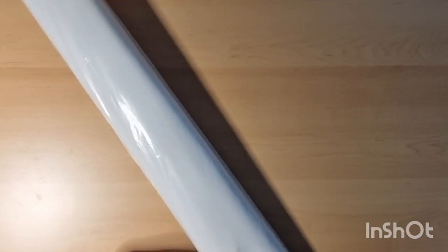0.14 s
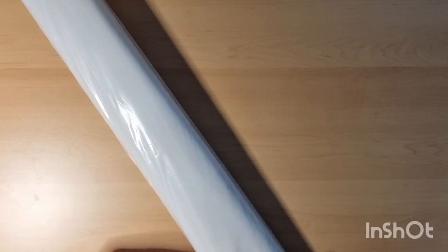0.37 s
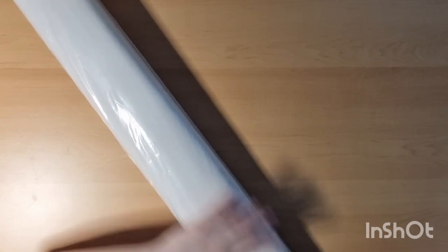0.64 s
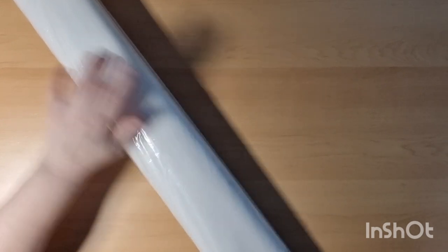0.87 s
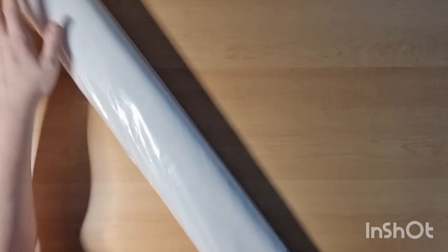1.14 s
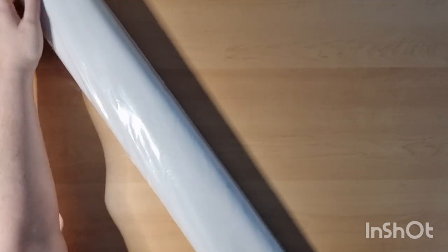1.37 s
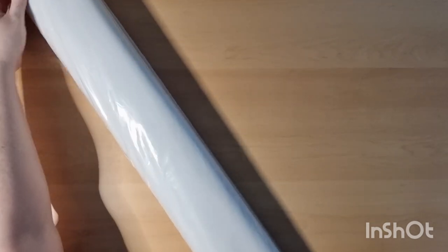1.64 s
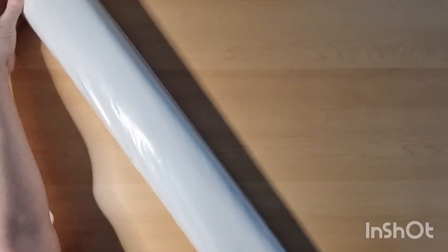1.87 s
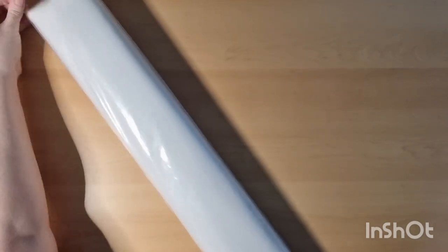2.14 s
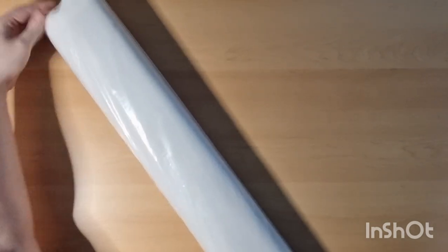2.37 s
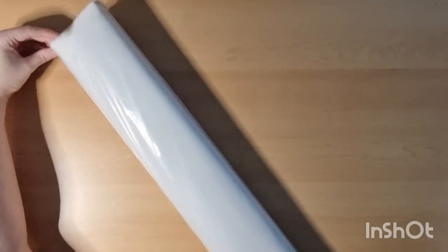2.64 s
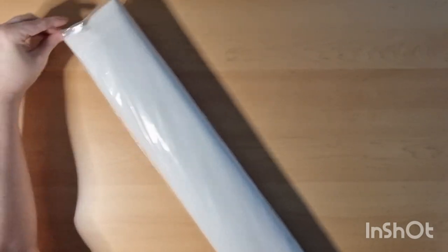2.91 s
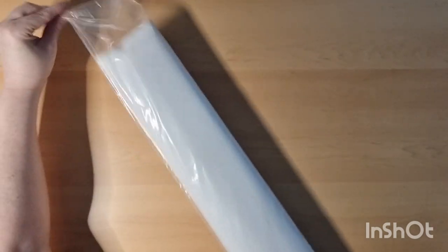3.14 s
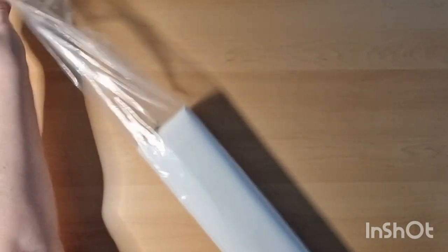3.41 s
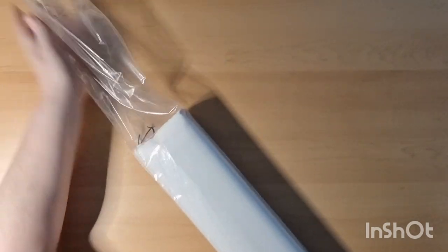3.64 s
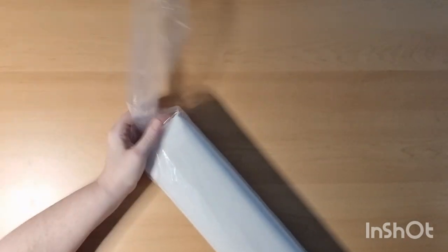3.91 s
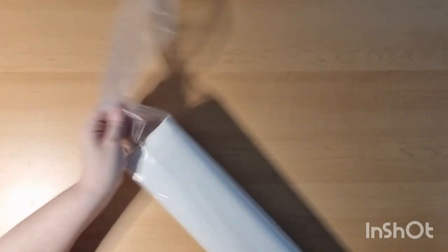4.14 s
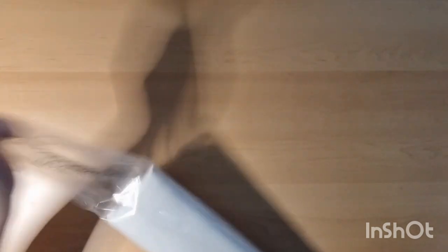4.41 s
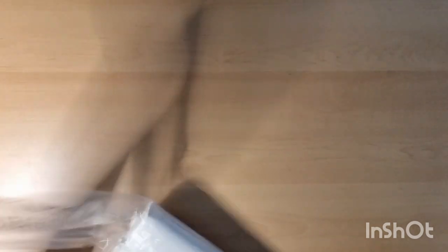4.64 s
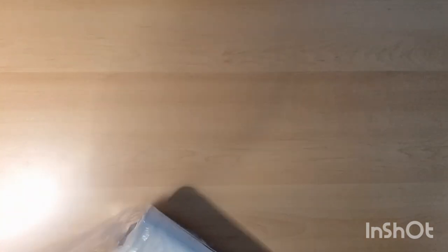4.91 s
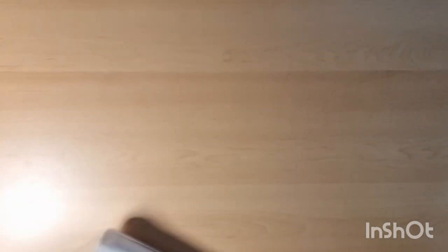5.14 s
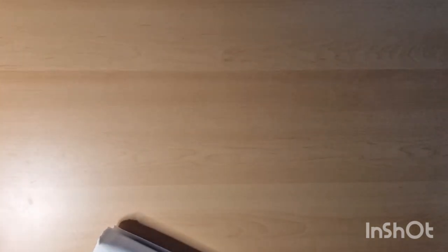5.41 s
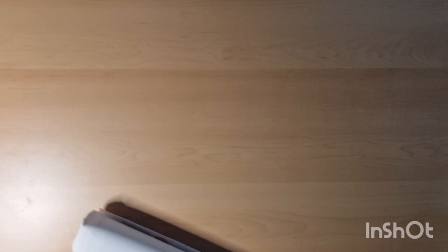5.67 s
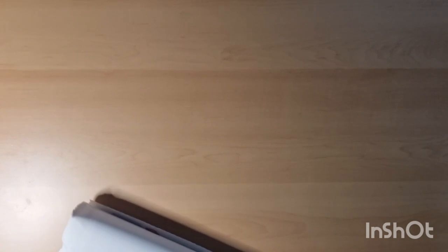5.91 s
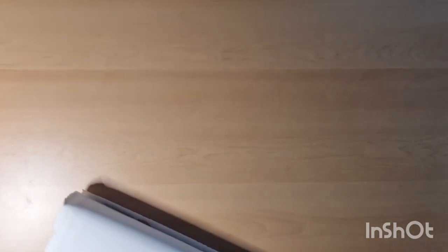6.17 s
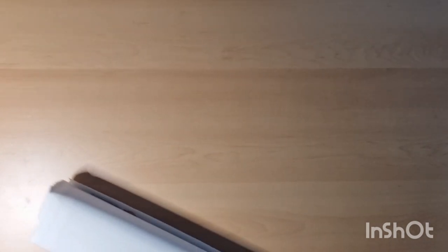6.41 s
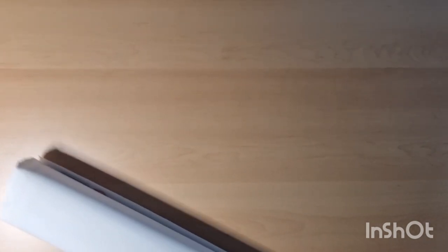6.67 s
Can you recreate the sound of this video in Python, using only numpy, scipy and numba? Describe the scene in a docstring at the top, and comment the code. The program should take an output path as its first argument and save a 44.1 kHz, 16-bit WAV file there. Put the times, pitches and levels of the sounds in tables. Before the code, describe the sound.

Plastic sleeve on a rolled canvas crinkles in short quiet bursts, then is pulled off with loud dense crackling, sharp snaps and soft table knocks.

```python
"""Film crackles in short bursts, with single snaps and soft knocks, over a low rumble:
hands pick at the plastic sleeve of a rolled canvas on a wooden table, then pull it off.
Buckling creases flick patches of film, each a damped sine; the roll rings with them and groans faintly.
The table top mirrors the crackle and knocks; a small room adds a short noise tail and filtered-noise rumble."""
import sys
import numpy as np
from scipy import signal
from scipy.fft import rfft, irfft, next_fast_len
from scipy.io import wavfile
from scipy.ndimage import uniform_filter1d
from numba import njit

SR = 44100
rng = np.random.default_rng(int(sys.argv[2]) if len(sys.argv) > 2 else 0)


def field_ratio(decibels):
    """Amplitude ratio for a level in dB (20 dB per decade); scalars and array-likes work."""
    return 10 ** (np.asarray(decibels, dtype=float) / 20)


def digitize_waveform(pressure):
    """Quantize a signal to 16-bit integers and store it at the path in sys.argv[1].

    Rows of a 2-D input are taken as channels; values are limited to [-1, 1].
    """
    field = np.atleast_2d(pressure).T
    bounded = np.clip(field, -1, 1)
    quanta = np.round(bounded * 32767).astype(np.int16)
    wavfile.write(sys.argv[1], SR, quanta)


N = 299434
T = np.arange(N) / SR

# where the hands work: start_s, left_lag_ms (left later than right), table_echo_ms, roll_ring_db
PLACE = [(0, -0.092, 1.13, -5), (1.2, -0.14, 1.19, -4.5), (2, 0.043, 1.22, -0.5), (3.2, 0.023, 1.14, -12),
         (3.6, 0.028, 0.63, -29), (4.2, 0.016, 0.99, -14.5), (4.8, 0.03, 0.976, -37),
         (5.6, 0.32, 0.98, -28), (6.79, 0.29, 0.96, -18)]


def curve(table, t=T):
    """Columns of a table, interpolated at times t."""
    s, *columns = np.transpose(table)
    return [np.interp(t, s, column) for column in columns]


def walk(rate_hz):
    """Random levels held 1 / rate_hz and slewed; spread near 1."""
    hold = int(SR / rate_hz)
    levels = np.repeat(rng.standard_normal(N // hold + 1), hold)
    return np.sqrt(1.5) * uniform_filter1d(levels, hold)[:N]


def shape(x, gain):
    """Filter by a gain given as a function of frequency."""
    n = next_fast_len(N)
    f = np.arange(n // 2 + 1) * SR / n + 1e-3
    return irfft(rfft(x, n) * gain(f), n)[..., :N]


def colour(points):
    """Gain through (Hz, dB) points, straight in log frequency."""
    hz, db = np.transpose(points)
    return lambda f: field_ratio(np.interp(np.log(f), np.log(hz), db))


def resonance(f, hz, width_hz):
    """Band-pass response of one mode, gain 1 at its centre."""
    return 1 / (1 + 1j * (f / hz - hz / f) * hz / width_hz)


def crackle():
    """Dense showers of small creases, some bigger than most, coming in flurries as the film is gripped."""
    # shape of the sleeve: start_s, fine_wrinkles_db (re crackle), folds_hz, hollow_under_film_hz
    sleeve = [(0, -10, 1820, 2350), (.95, -8, 1680, 2440), (1.1, -13.5, 1110, 2100),
              (1.5, -11.5, 1700, 2940), (1.95, -8, 1210, 2720), (2.93, -6, 1740, 3280),
              (2.97, -5, 2450, 5050), (3.09, -14, 2600, 4970), (3.125, -11.5, 1970, 3200),
              (3.3, -3.5, 1750, 2880), (3.7, -11.5, 4230, 3260), (3.83, -10.5, 1850, 3430),
              (4.0, -10.5, 1620, 3180), (4.4, -2.5, 1110, 3380), (4.56, -3.5, 2030, 3250),
              (4.61, -7, 865, 3300), (4.66, -4, 1510, 3350), (4.72, -8.5, 1110, 3370),
              (4.95, -7, 1450, 3150), (5.04, -10, 1000, 3360), (5.17, -7.5, 1600, 2420),
              (6.79, -6.5, 950, 4270)]
    creases_per_s = 1700
    chance = rng.random((int(creases_per_s * N / SR), 2))
    s = chance[:, 0] * N / SR
    at = (s * SR).astype(int)
    db, low_db = effort(s)
    brightness = rng.standard_normal(len(s))
    high_db, folds_hz, hollow_hz = curve(sleeve, s)
    high_db = high_db + 1.0 * brightness
    # the folds keep shifting, so their pitches wander
    folds_hz = folds_hz * np.exp(.08 * walk(30)[at])
    hollow_hz = hollow_hz * np.exp(.035 * walk(20)[at])
    # now hollow, now papery
    stands_db = np.maximum(7 + 1.5 * walk(25)[at], 0)
    flurry_db = (1.68 * walk(70) + 1.19 * walk(28))[at]
    # exponential excess, levelling off at 9 dB
    big_db = 9 * np.tanh(-3.2 * np.log(chance[:, 1]) / 9)
    return creases(s, db + flurry_db + big_db, low_db, high_db, [folds_hz, hollow_hz], count=9,
                   spread_s=.0011, scatter_db=4, cycles=2.0, roam_ms=0.076, peak_db=stands_db, width=.12)


def effort(s):
    """Crackle level and share of large folds at times s: grips bite, swell or sink, and die away when let go."""
    # grips and pulls: start_s, length_s, end_level_db, swell_db (up to the end), large_folds_db (re crackle)
    grips = [(0, 0.066, -59, -7.5, -11), (0.129, 0.06, -53.5, 19, -7.5), (0.268, 0.17, -51, 21.5, -7),
             (0.462, 0.19, -59, -6.5, -3.5), (0.678, 0.26, -56, -3.5, -8), (1.054, 0.067, -46.5, 21, -7.5),
             (1.201, 0.057, -53, -0.5, -7), (1.34, 0.12, -59, 2, -6.5), (1.463, 0.15, -53, 3.5, -6.5),
             (1.746, 0.16, -64.5, -6, -10), (1.951, 0.021, -54, 0.5, -10.5),
             (2.072, 0.081, -53.5, 19, -8.5), (2.406, 0.016, -54.5, 8, -12.5), (2.493, 0.045, -57.5, 6, -7),
             (2.605, 0.12, -59.5, -5, -7.5), (2.785, 0.4, -55.5, 2, -3), (2.972, 0.056, -52, 0, -4.5),
             (3.061, 0.15, -47.5, -3, -6), (3.232, 0.066, -45, 11.5, -9), (3.359, 0.085, -60, -8, -12),
             (3.463, .11, -52.5, 13.5, -1.5), (3.639, 0.15, -44, 8.5, -10.5), (3.79, 0.06, -41.5, 15, -7.5),
             (3.939, 0.035, -44, -1, -4.5), (4.027, 0.03, -48.5, 10, -4.5), (4.122, 0.11, -42, 13, -0.5),
             (4.256, 0.045, -50, -2, -2.5), (4.347, 0.011, -50, -7.5, -0.5), (4.393, 0.11, -44.5, -1, 1),
             (4.52, 0.15, -37.5, 10.5, -4), (4.72, 0.015, -41, -6.5, -7.5), (4.756, 0.031, -56, 1, 7.5),
             (4.932, 0.09, -45.5, 7.5, -4.5), (5.069, 0.017, -45.5, 6, -5), (5.142, 0.031, -44.5, 2, -5),
             (5.6, 0.15, -62, 4.5, -9.5), (5.906, 0.07, -57, -2.5, -3), (5.97, 0.047, -53, 6, -11.5)]
    attack_db_per_s, release_db_per_s = 900, 245
    settling_db, settling_folds_db = -71, -5  # the film creeps back on its own between grips
    start, length, end_db, swell_db, folds_db = np.transpose(grips)[..., None]
    since = s - start
    db = end_db - swell_db * (1 - np.clip(since / length, 0, 1))
    db = db + attack_db_per_s * np.minimum(since, 0)
    db = db - release_db_per_s * np.maximum(since - length, 0)
    power = field_ratio(np.maximum(db, -150)) ** 2
    rest = field_ratio(settling_db) ** 2
    total = power.sum(0) + rest
    share_db = ((power * folds_db).sum(0) + rest * settling_folds_db) / total
    return 10 * np.log10(total), share_db


def creases(s, db, low_db, high_db, peaks_hz, count, spread_s, scatter_db, cycles, roam_ms, peak_db,
            width=0.13):
    """Each buckling crease flicks patches of film of every size; big patches ring low, some sizes stand out."""
    film_low, film_high = np.log([210, 16500])  # log Hz
    low_zone, mid_zone, high_zone = np.log([850, 3700, 10600])  # log Hz
    chance = rng.random((len(s), count, 4))
    odd = rng.standard_normal((len(s), count, 3))

    place_in_band = (np.arange(count) + chance[..., 0]) / count
    hz = np.exp(film_low + place_in_band * (film_high - film_low))
    low = np.clip((np.log(hz) - mid_zone) / (low_zone - mid_zone), 0, 1)
    high = np.clip((np.log(hz) - mid_zone) / (high_zone - mid_zone), 0, 1)
    favoured = sum(np.exp(-(np.log(hz / p[:, None]) / width) ** 2) for p in peaks_hz)

    tone_db = db[:, None] + low * low_db[:, None] + high * high_db[:, None]
    tone_db = tone_db + np.reshape(peak_db, (-1, 1)) * favoured + scatter_db * odd[..., 0]
    # thin film radiates poorly from its largest patches
    tone_db = tone_db - 20 * np.log10(1 + (330 / hz) ** 2)
    turns = cycles * (.5 + 3 * chance[..., 1] ** 3) * (1 + .2 / width * favoured)
    size = field_ratio(tone_db) * np.sqrt(hz / np.exp(mid_zone) / turns) * np.sign(chance[..., 2] - .5)

    start = s[:, None] - spread_s * np.log(chance[..., 3])
    lag_ms = curve(PLACE, s)[0][:, None] + roam_ms * odd[..., 1]
    # large patches reach both ports alike, small ones beam unevenly
    side_db = 0.39 + 2.4 * (1 - low) * odd[..., 2]
    channels = []
    for ear in (1, -1):  # left, right
        ear_start = (start + ear * lag_ms / 2000) * SR
        ear_size = size * field_ratio(ear * side_db)
        channels.append(rings(ear_start.ravel(), hz.ravel(), turns.ravel(), ear_size.ravel(), N))
    return np.array(channels)


@njit
def rings(start, hz, cycles, size, length, rise=.3):
    """Damped sines that start between samples, swell in rise cycles and fade by 1/e every given cycles."""
    out = np.zeros(length)
    for k in range(len(start)):
        first = int(start[k]) + 1
        late = first - start[k]
        pole = (2j * np.pi - 1 / cycles[k]) * hz[k] / SR
        z, turn = size[k] * np.exp(pole * late), np.exp(pole)
        held, ease = np.exp(-hz[k] / SR / rise * late), np.exp(-hz[k] / SR / rise)
        last = min(first + int(6 * cycles[k] * SR / hz[k]), length)
        for j in range(max(first, 0), last):
            out[j] += z.imag * (1 - held)
            z, held = z * turn, held * ease
    return out


def snaps():
    """A long crease gives way within a millisecond or two; its neighbours follow in a fading shower."""
    # single snapping creases: start_s, level_db, pitch_hz, high_part_db
    snap_list = [(0.1353, -44, 4110, -15), (0.1814, -43, 2430, -6), (0.291, -42.5, 1510, -29),
                 (1.154, -42, 5000, -20), (1.2433, -38, 5700, -8.5), (1.4695, -38, 1680, -16),
                 (1.7223, -39.5, 1080, -22), (1.8615, -36.5, 1760, -41), (1.952, -35.5, 1160, -54),
                 (2.144, -42, 1600, -18), (2.325, -42.5, 1530, -9), (2.416, -42, 3100, -6),
                 (2.785, -38, 2880, -5), (2.925, -39, 1820, -8), (2.9762, -43.5, 2460, 8.5),
                 (2.994, -29, 5270, -6), (3.058, -39, 5030, -13), (3.3037, -18.5, 2900, -30),
                 (3.315, -43, 2900, 2), (3.333, -38, 3100, -20), (3.3904, -29, 3180, -5),
                 (3.468, -42, 3600, 3), (3.517, -38.5, 3100, -12), (3.569, -43.5, 3170, 0),
                 (3.713, -37, 3350, -1.5), (3.772, -30, 3480, -31), (3.828, -32.5, 3220, -9),
                 (3.8475, -27.5, 1770, -18), (3.896, -28, 900, -39), (3.92, -47, 1580, -33),
                 (4.0269, -35.5, 3200, -7), (4.0548, -32.5, 4660, 2), (4.137, -38, 3600, -7),
                 (4.22, -32.5, 3200, 0), (4.2599, -25.5, 3220, -6), (4.3034, -29.5, 1220, -8),
                 (4.342, -34.5, 1180, 8.5), (4.4017, -24, 1500, -12), (4.4338, -23, 6000, -4.5),
                 (4.472, -28, 1120, -12), (4.501, -34, 5800, -8), (4.515, -30, 5600, -8),
                 (4.673, -33, 5400, -3), (4.7195, -26.5, 3500, -12), (4.7282, -34, 5050, -1),
                 (4.813, -42.5, 1360, 0.5), (4.901, -37, 6400, -10), (4.931, -30.5, 1310, -38.5),
                 (4.9457, -38, 3070, -2), (4.982, -25.5, 1410, -33), (4.986, -38, 5270, -1),
                 (5.1468, -28.5, 2270, -25), (5.338, -45, 3700, -36.5), (5.402, -43, 3630, -11),
                 (5.7252, -40.5, 3240, -7), (5.9585, -42, 3530, -8), (6.015, -38, 2860, -16),
                 (6.37, -54, 3100, -17), (6.483, -45, 4460, -27), (6.6314, -46.5, 4500, -14)]
    s, db, hz, high_db = np.transpose(snap_list)
    low_db = effort(s)[1] - 6
    crack = creases(s, db, low_db, high_db, [hz], count=28, spread_s=0.0007,
                    scatter_db=1.0, cycles=0.94, roam_ms=0.056, peak_db=9, width=0.25)
    shower = creases(s, db - 10.5, low_db, high_db, [hz], count=60, spread_s=0.0045,
                     scatter_db=2.5, cycles=1.7, roam_ms=.04, peak_db=5, width=.18)
    return crack + shower


def ticks():
    """A tiny wrinkle pops all at once, thin and bright: no pitch, little bass."""
    # ticking fine wrinkles: start_s, level_db
    tick_list = [(0.227, -47), (0.425, -47.5), (0.438, -56), (1.5688, -43.5), (1.5903, -45), (1.7594, -56),
                 (1.8062, -44.5), (1.829, -55), (1.936, -51), (1.9946, -49), (2.302, -47.5),
                 (2.5025, -41.5), (2.951, -44), (3.283, -49), (3.293, -48), (3.372, -41), (3.5418, -41),
                 (3.9439, -49), (4.001, -48), (4.1874, -41), (4.233, -42), (4.665, -38), (4.8713, -44.5),
                 (5.226, -53), (5.3862, -63), (5.69, -56), (6.1014, -50.5)]
    s, db = np.transpose(tick_list)
    return creases(s, db, 0 * s - 18, 0 * s + 1.5, [], count=24, spread_s=.0008,
                   scatter_db=3.5, cycles=1.4, roam_ms=.04, peak_db=0)


def knocks():
    """The roll bumps the table: a few cycles of roll and table top."""
    # bumps: start_s, level_db, pitch_hz
    knock_list = [(0.549, -48, 326), (0.804, -41, 317), (0.822, -42, 324), (1.133, -37, 1110),
                  (1.591, -38, 490), (1.615, -38, 404), (2.311, -45.5, 520), (2.431, -40, 422),
                  (4.256, -30, 705), (4.4037, -27, 910)]
    s, db, hz = np.transpose(knock_list)
    return rings(s * SR, hz, 0 * s + 2.4, field_ratio(db), N)


def groan():
    """The dragged roll groans faintly: a weak falling sine under a rounded envelope."""
    # one groan: start_s, length_s, first_hz, last_hz, level_db
    drag = (4.5, 0.43, 310.5, 204.5, -61)
    start, length, first_hz, last_hz, db = drag
    part = np.clip((T - start) / length, 0, 1)
    phase = 2 * np.pi * np.cumsum(first_hz + part * (last_hz - first_hz)) / SR
    return field_ratio(db) * 2 * np.sqrt(part * (1 - part)) * np.sin(phase)


def roll_ring(film):
    """Film excites the damped modes of the roll."""
    # modes of the roll: centre_hz, width_hz, relative_db
    roll_modes = [(313, 21, 17), (665, 78, 1), (1144, 39, 8), (1680, 24, 0)]
    return shape(film, lambda f: sum(field_ratio(db) * resonance(f, hz, w) for hz, w, db in roll_modes))


def table_mirror(near, echo_ms):
    """The table top reflects the sound, delayed slightly differently at the two ports."""
    left, right = near
    late_left = np.interp(T - (echo_ms + .03) / 1000, T, left)
    late_right = np.interp(T - (echo_ms - .03) / 1000, T, right)
    return field_ratio(-10) * np.array([late_left, late_right])


def ports(noise, alike_hz):
    """Two microphone ports in a diffuse field: bass mostly alike, treble unrelated from alike_hz up."""
    side = lambda f: np.clip(.2 + .8 * f / alike_hz, 0, 1)
    mid = lambda f: np.sqrt(2 - side(f) ** 2)
    return shape(noise[0], mid) + shape(noise[1], side) * np.array([[1], [-1]])


def room(x, t60_s, db, first_s):
    """Diffuse tail that starts after the nearest wall, duller than the source."""
    fade = np.exp(-np.log(1000) * T / t60_s) * (T > first_s)
    diffuse = ports(rng.standard_normal((2, N)) * fade, 1000)
    tail = shape(diffuse, lambda f: 1 / (1 + 1j * f / 9000))
    tail = tail[:, :SR] / np.sqrt((tail ** 2).sum(1).mean())
    return field_ratio(db) * signal.fftconvolve(x.mean(0)[None], tail, axes=1)[:, :N]


def room_tone():
    """Wavering rumble that fills the low modes of the room, over faint hiss."""
    # spectrum ahead of the modes: freq_hz, relative_db
    tone_points = [(15, -34), (25, 8), (130, 1), (270, -14), (677, -12), (1000, -26.5), (1700, -13.5),
                   (3340, -16), (12500, -36), (16000, -44)]
    # low modes of the room: centre_hz, width_hz, power_db
    low_modes = [(72, 11, 9), (135, 14, 4), (325, 16, 9)]
    level_db, waver_db = -57.5, 0.8
    boom = lambda f: 1 + sum(field_ratio(db) * abs(resonance(f, hz, w)) ** 2 for hz, w, db in low_modes)
    hiss = ports(rng.standard_normal((2, N)), 1400)
    air = shape(shape(hiss, colour(tone_points)), boom)
    return air / air.std() * field_ratio(level_db + waver_db * walk(3))


def scene():
    """Film, its ring in the roll and its mirror in the table, then the room."""
    _, echo_ms, ring_db = curve(PLACE)
    # the creases lie at changing heights above the table
    echo_ms = echo_ms * (1 + .03 * walk(12))
    film = crackle() + snaps() + ticks()
    near = film + field_ratio(ring_db) * roll_ring(film) + knocks() + groan()
    near = near + table_mirror(near, echo_ms)
    return near + room(near, t60_s=0.15, db=-7.0, first_s=0.0048) + room_tone()


def roll_off(x):
    """The treble ends steeply here."""
    return signal.sosfilt(signal.butter(12, 16820, fs=SR, output="sos"), x)


def record(dry):
    """The microphone in its housing colours the scene."""
    # response of the housed microphone: freq_hz, gain_db
    housing = [(30, -11), (55, 0.5), (1900, -2), (2500, -3), (3150, -1.5), (4500, 1), (5900, 3.5),
               (7500, 0.5), (9000, 7), (10700, 4), (12700, 9), (15500, 6.5), (16200, -36)]
    mix = shape(dry, colour(housing))
    return roll_off(mix)


dry = scene()
out = record(dry)
digitize_waveform(out)
```